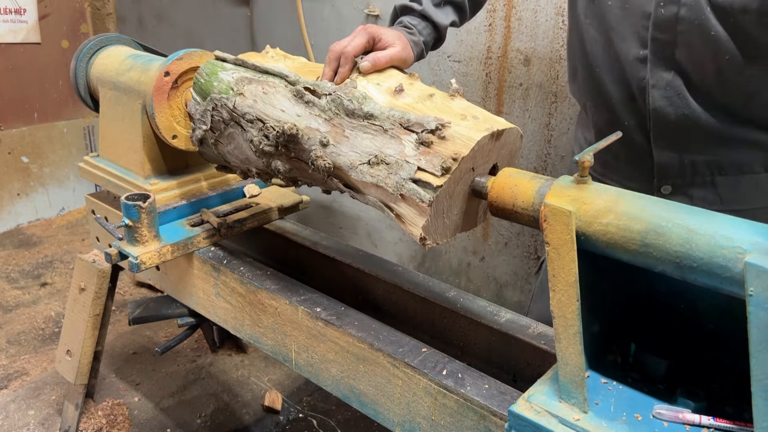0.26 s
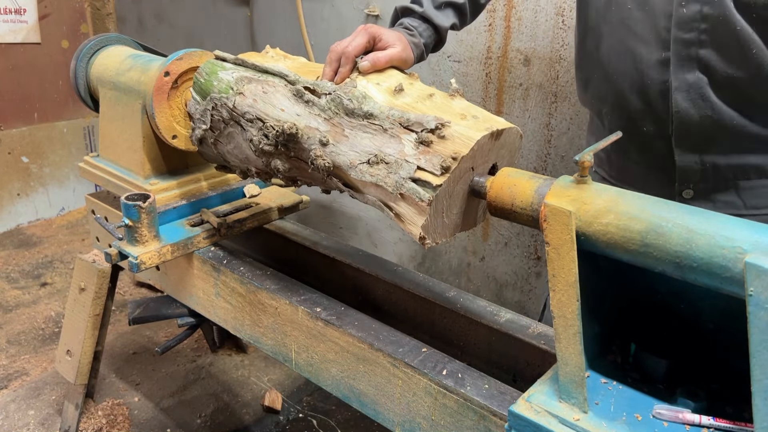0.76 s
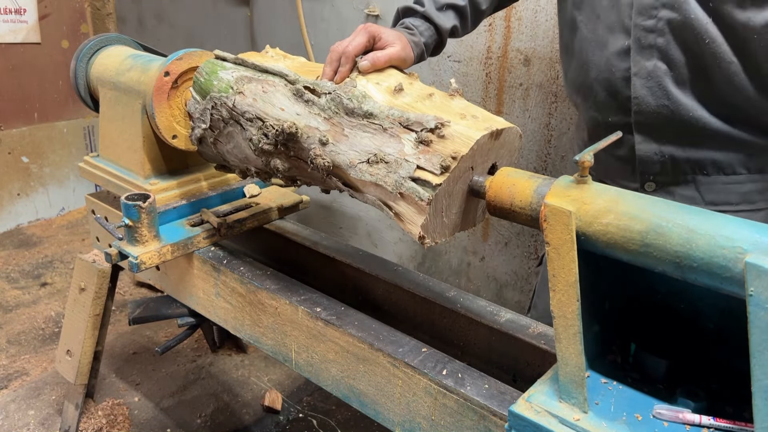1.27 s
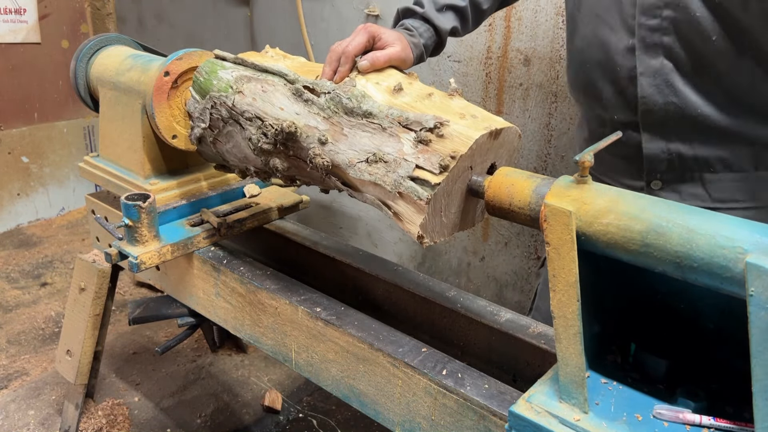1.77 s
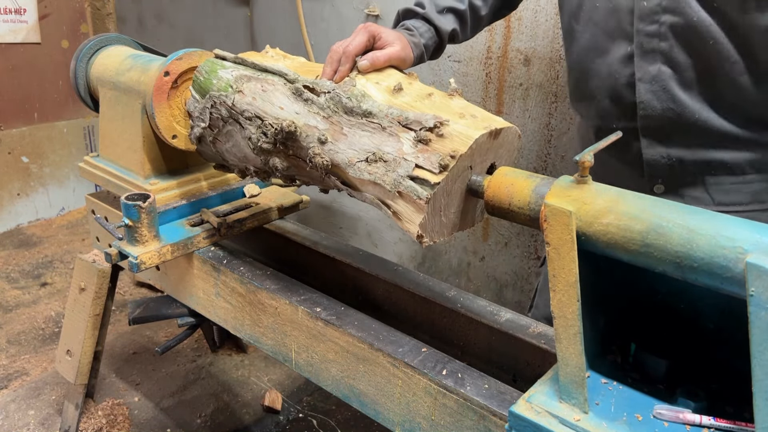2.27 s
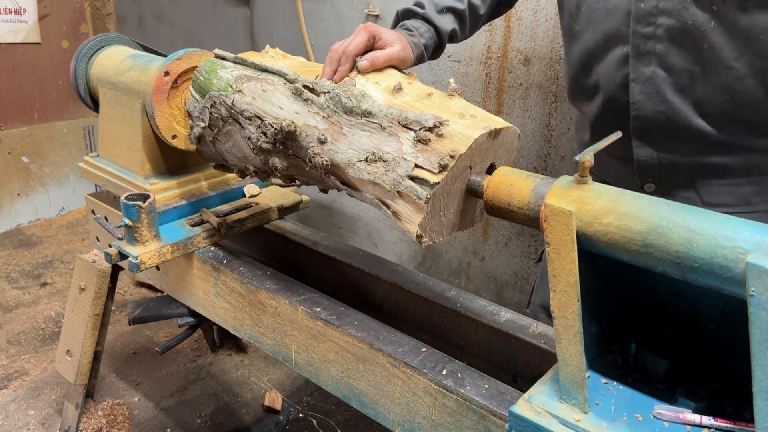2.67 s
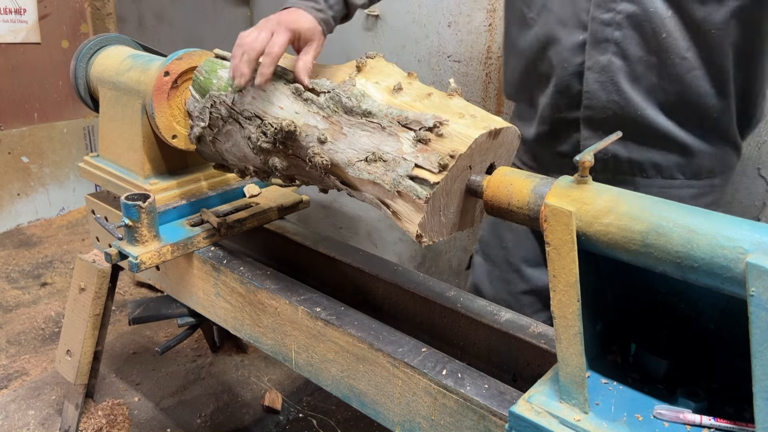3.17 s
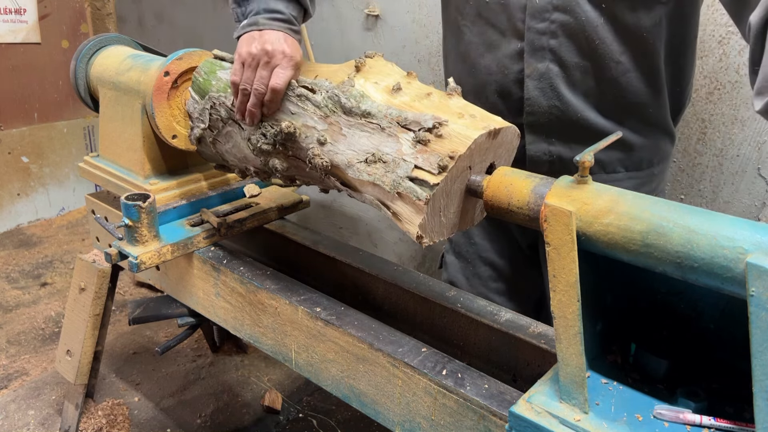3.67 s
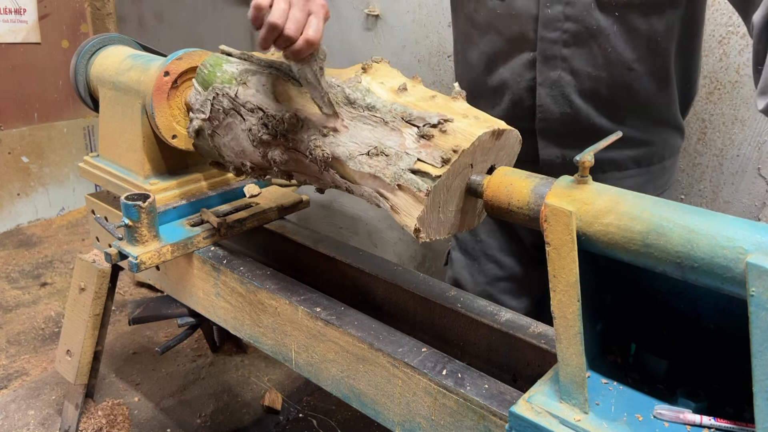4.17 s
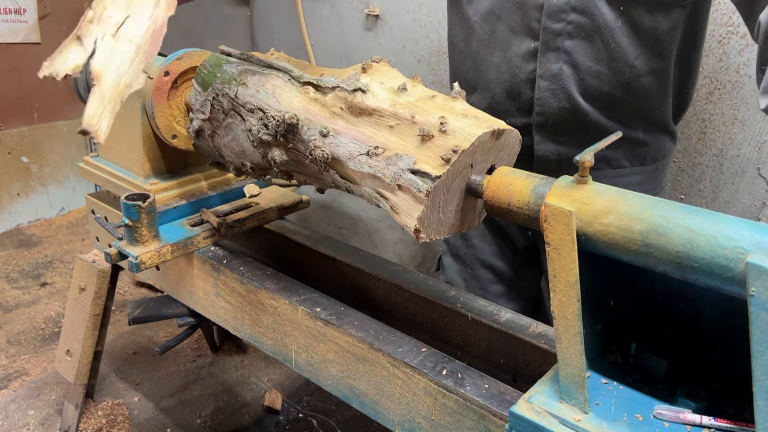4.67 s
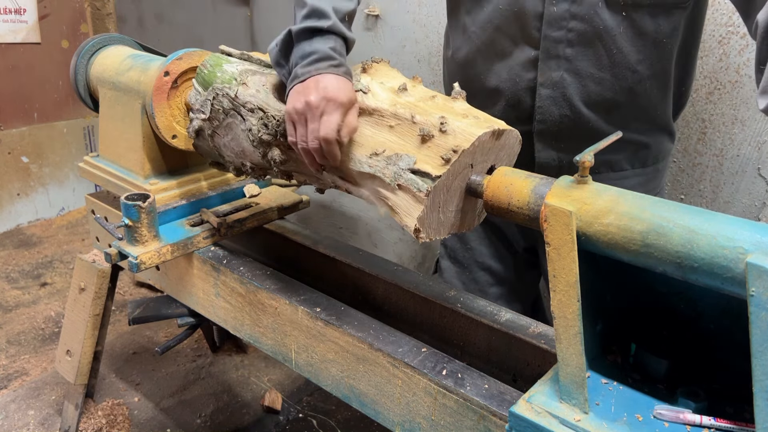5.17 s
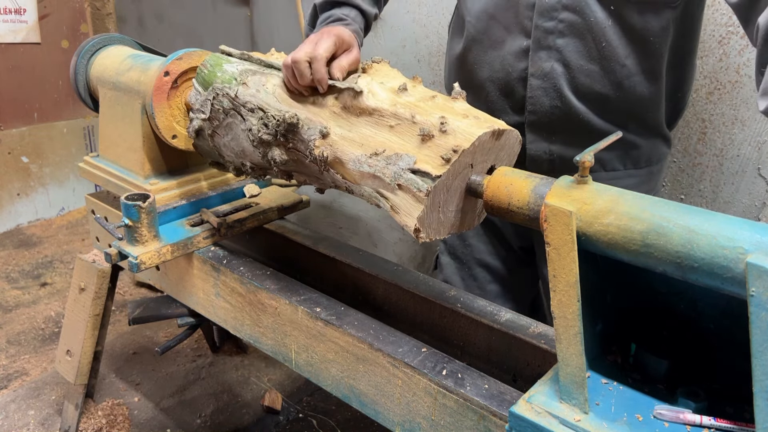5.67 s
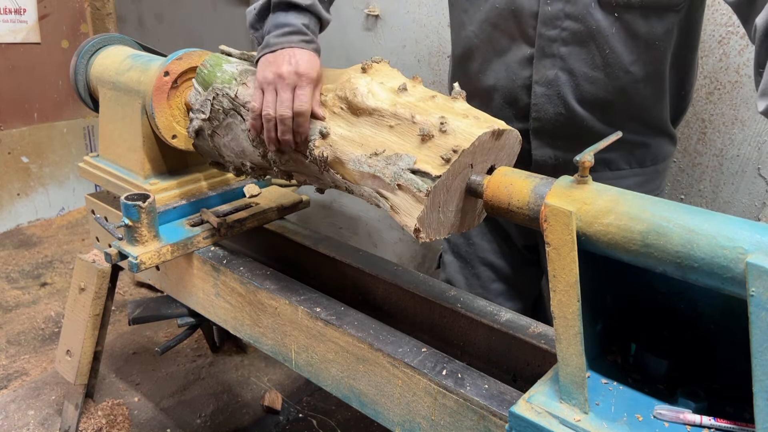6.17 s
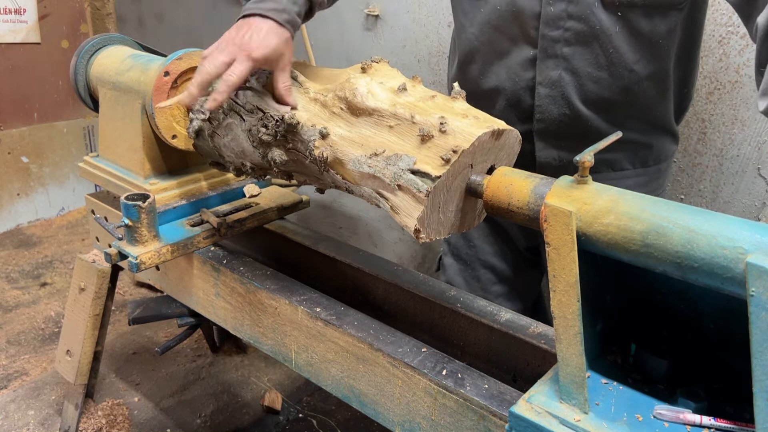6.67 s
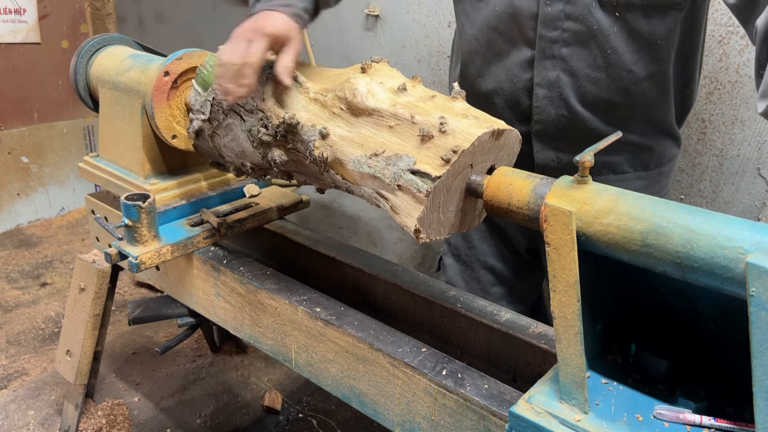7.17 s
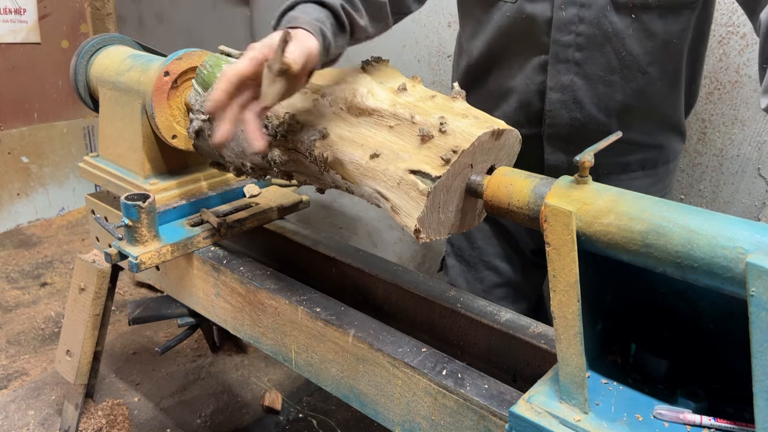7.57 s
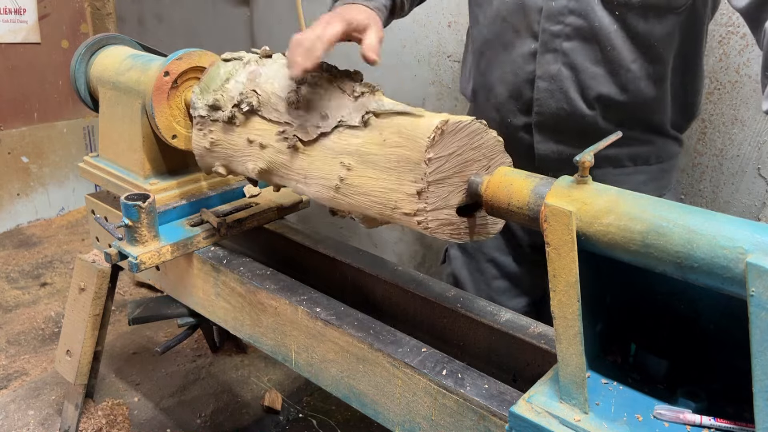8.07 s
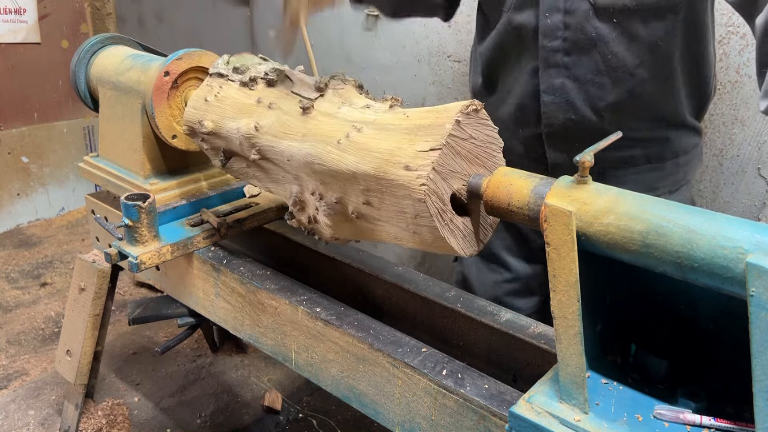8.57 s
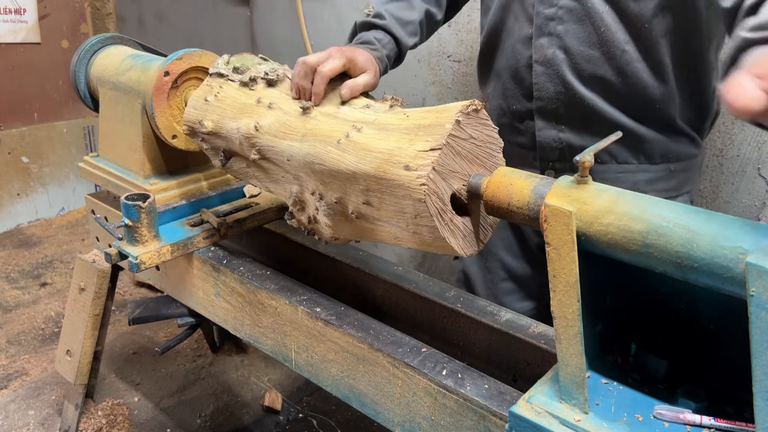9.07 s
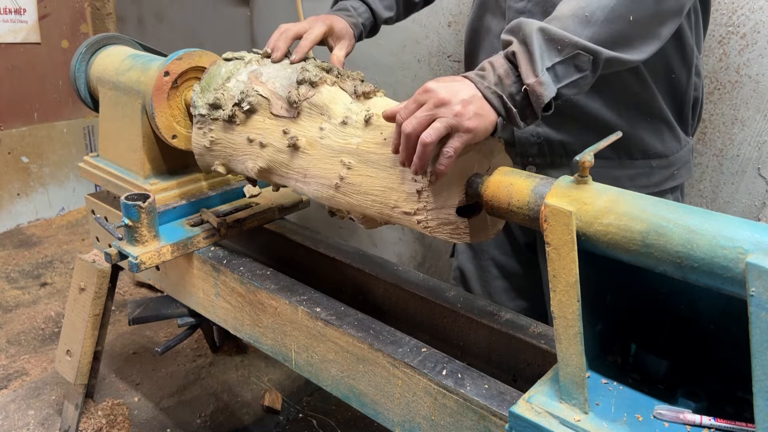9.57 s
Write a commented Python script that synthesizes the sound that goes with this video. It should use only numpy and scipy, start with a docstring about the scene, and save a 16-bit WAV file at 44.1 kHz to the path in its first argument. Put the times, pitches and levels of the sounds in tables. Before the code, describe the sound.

Brittle bark cracks and short fibrous tears in a small echoing workshop, after a few footfalls, with faint birds and a passing vehicle.

```python
"""Bark torn off a log in a workshop

Dry bark snaps off a log held in a lathe: noisy breaks strike resonant modes; torn fibres are sparse grains.
A soft knock at the end is made the same two ways. Slapping footfalls are struck modes too; rustling clothes
are swelling grainy noise. All these echo in the room. A vehicle passes outside as a drone and filtered noise;
birds and a thin whistle are gliding tones, and insects, traffic and air are shaped noise.
Two spaced microphones hear it."""
import sys
import numpy as np
from scipy import signal
from scipy.fft import rfft, irfft
from scipy.io import wavfile

SR = 44100
rng = np.random.default_rng(int(sys.argv[2]) if len(sys.argv) > 2 else 0)


def store_pcm(level_fs):
    """Save levels as 16-bit WAV."""
    pcm = np.round(np.clip(level_fs, -1, 1) * 32767).astype(np.int16)
    wavfile.write(sys.argv[1], SR, np.atleast_2d(pcm).T)


N = 433062


def amp(db):
    """Decibel law: the amplitude gain of a level in dB."""
    return 10 ** (np.asarray(db) / 20)


def rms_one(x):
    """Normalization of power: scale to an rms of 1."""
    return x / np.sqrt(np.mean(x ** 2) + 1e-20)


def in_time(rows):
    """Linear interpolation: the columns of a curve at every sample."""
    times, *columns = np.transpose(rows)
    return [np.interp(np.arange(N) / SR, times, column) for column in columns]


def at_hz(points, hz):
    """Logarithmic frequency scale: read a curve of (frequency, value) evenly by octaves."""
    point_hz, values = np.array(points).T
    return np.interp(np.log(hz), np.log(point_hz), values)


def drift(rate_hz):
    """Low-pass filtered noise: a slow random wander with spread 1."""
    step = 40  # samples between computed values
    pole = np.exp(-2 * np.pi * rate_hz * step / SR)
    white = rng.standard_normal(N // step + 2002)
    slow = signal.lfilter([1], [1, -2 * pole, pole ** 2], white)[2000:]  # skip the start of the filter
    return np.interp(np.arange(N) / step, np.arange(len(slow)), rms_one(slow))


# Likeness of the two sides, greatest in the bass: (frequency [Hz], correlation [0 to 1])
SIDE_LIKENESS = [(30, .0), (55, 0.81), (90, 0.784), (140, 0.17), (290, 0.042), (15000, 0)]


def coloured(white, spectrum):
    """Spectral shaping and coherence: filtered stereo noise, its bass partly shared by the sides; rms 1."""
    hz = np.maximum(np.arange(N // 2 + 1) * SR / N, 1)
    alike = np.clip(at_hz(SIDE_LIKENESS, hz), 0, 1)
    gain = amp(at_hz(spectrum, hz)) * (hz > spectrum[0][0])
    mid, side = rfft(white) * gain * np.sqrt([1 + alike, 1 - alike])
    return rms_one(irfft([mid + side, mid - side], N))


def grains(spread_db, share):
    """Sparse random impulses: white noise thinned to a share of uneven grains."""
    size_db = spread_db * np.minimum(rng.exponential(1, (2, N)), 4)
    present = rng.random((2, N)) < share
    return rng.standard_normal((2, N)) * amp(size_db) * present


def swells(events, sharpness):
    """Addition of powers: the gain over time of rubs that swell and fade."""
    power = np.zeros(N)
    for s, length, db in events:
        at, n = round(s * SR), round(length * SR)
        power[at:at + n] += amp(2 * db) * np.hanning(n)[:N - at] ** sharpness
    return np.sqrt(power)


def blows(events, modes, dull_hz, middle_hz, bright_hz,
          scatter_db, lag_ms, rough_db, rise_ms, first_click, ring_db):
    """Modal excitation: dying runs of uneven clicks strike damped modes; gives near and all-round sound."""
    near, all_round, t = np.zeros((2, N)), np.zeros(N), np.arange(4000) / SR
    hz, width_hz, mode_db = np.transpose(modes)
    decay = np.exp(-np.pi * width_hz / SR)[:, None]  # a wide mode dies quickly
    samples = np.arange(len(t))
    rings = (1 - decay) * decay ** samples * np.sin((2 * np.pi * hz / SR)[:, None] * samples)
    signs = (-1) ** np.arange(len(hz))  # neighbouring modes start in opposite phase
    for s, db, pan_db, ring_hz, bright_db, ms, dull_db in events:
        tilt = at_hz([(dull_hz, dull_db), (middle_hz, 0), (bright_hz, bright_db)], hz)
        # the piece that moves favours the modes near its own pitch
        tilt += ring_db * np.exp(-(np.log2(hz / ring_hz) / 0.33) ** 2)
        scatter = scatter_db * rng.standard_normal((2, len(hz)))
        strengths = amp(mode_db + tilt + scatter) * signs

        clicks = rng.standard_normal(len(t)) * amp(rough_db * rng.exponential(1, len(t)))
        clicks *= np.exp(-t * 1000 / ms) * np.minimum(t * 1000 / rise_ms, 1)
        # one strong click as the rise ends
        clicks[round(rise_ms * SR / 1000)] += first_click * np.sqrt(np.sum(clicks ** 2))
        sound = signal.fftconvolve(strengths @ rings, clicks[None], axes=1)[:, :len(t)]

        # height of a dying sine with the same energy
        height = 2 * np.sqrt(np.sum(sound ** 2, axis=1, keepdims=True) / (ms * SR / 1000))
        sound *= amp(db + pan_db * np.array([[.5], [-.5]])) / height

        # unscattered colour sent towards the walls, with the mean energy of the two sides
        even = amp(mode_db + tilt) * signs @ rings
        even *= np.sqrt(np.mean(np.sum(sound ** 2, axis=1)) / np.sum(even ** 2))
        at = round(s * SR)
        all_round[at:at + len(t)] += even[:N - at]

        # the microphones stand apart: one side hears it first
        lag = rng.uniform(-.5, .5) * lag_ms / 1000
        for side, delay in enumerate([lag, -lag]):
            at = round((s + delay) * SR)
            near[side, at:at + len(t)] += sound[side, :N - at]
    return near, all_round


# Far traffic: (time [s], hum level [dB])
TRAFFIC_HUM = [(0.0, -52), (3.33, -54.5), (5.4, -48), (5.7, -44.5), (6.12, -44.5), (6.5, -49), (7.45, -49),
               (7.75, -55), (8.7, -49.5), (9.35, -52.5), (9.82, -45)]
# Spectrum of the traffic: (frequency [Hz], density [dB per Hz])
TRAFFIC_SPECTRUM = [(12, -37.5), (20, 4), (49, -7.5), (81, -2), (95, -0.5), (119, -8), (150, -12),
                    (188, -16), (260, -17), (340, -45.5), (570, -120)]
DEEP_DB, DEEP_SWING = -58.5, 1.7  # deep level when the hum is at its mean; ratio of the swings in dB


def traffic():
    """Band-split noise: a hum around 90 Hz and a deeper rumble that swells with it, but more."""
    hum_db, = in_time(TRAFFIC_HUM)
    both = coloured(rng.standard_normal((2, N)), TRAFFIC_SPECTRUM)
    deep = signal.sosfiltfilt(signal.butter(2, 55, fs=SR, output="sos"), both)
    deep_db = DEEP_DB + DEEP_SWING * (hum_db - hum_db.mean())
    return amp(hum_db) * rms_one(both - deep) + amp(deep_db) * rms_one(deep)


# Spectrum of the open air: (frequency [Hz], density [dB per Hz])
AIR_SPECTRUM = [(88, -38), (150, -1), (1280, -18.5), (2050, -23), (3040, -23), (3930, -29.5), (4870, -20),
                (5590, -31), (8970, -36.5), (12300, -52), (15300, -58.5), (16500, -61)]
AIR_MEAN_DB, AIR_FOLLOWS = -56.5, .3  # mean level; share of the traffic's swing


def air():
    """Broadband noise: a hiss whose level drifts and partly follows the traffic."""
    hum_db, = in_time(TRAFFIC_HUM)
    level_db = AIR_MEAN_DB + AIR_FOLLOWS * (hum_db - hum_db.mean()) + 1.5 * drift(1.0)
    return amp(level_db) * coloured(rng.standard_normal((2, N)), AIR_SPECTRUM)


INSECT_HZ, INSECT_WIDTH_HZ, INSECT_DB, INSECT_THROB_HZ = 4660, 780, -81.5, 5.3


def insects():
    """Amplitude-modulated band noise: a far trilling that throbs unevenly."""
    edges = [INSECT_HZ - INSECT_WIDTH_HZ / 2, INSECT_HZ + INSECT_WIDTH_HZ / 2]
    band_pass = signal.butter(2, edges, "band", fs=SR, output="sos")
    band = signal.sosfilt(band_pass, rng.standard_normal((2, N)))
    return amp(INSECT_DB + 5.0 * drift(INSECT_THROB_HZ)) * rms_one(band)


# Single notes, levels before the mix:
# (time [s], length [s], first pitch [Hz], last pitch [Hz], level [dB], wavering [Hz])
BIRD_NOTES = [(3.245, 0.0863, 1627, 1446, -62, 363), (6.7, 0.063, 3507, 3474, -63.5, 110),
              (7.041, 0.0626, 5020, 4960, -63.5, 40), (7.609, .05, 4234, 4200, -70.5, 30.33),
              (8.07, 0.0625, 3100, 3133, -65, 180), (8.193, 0.097, 3810, 3582, -63, 29),
              (8.436, 0.069, 3560, 3540, -55.5, 40)]
# A three-note chirp, up, held, down:
# (offset [s], length [s], first pitch [Hz], last pitch [Hz], relative level [dB], wavering [Hz])
CHIRP_NOTES = [(0, 0.03924, 3160, 3388, -4, 199), (0.02, 0.0619, 3533, 3480, -2.5, 110.6),
               (0.066, .085, 3080, 2760, -8.5, 230)]
# When the chirp sounds, levels before the mix: (time [s], level [dB])
CHIRP_TIMES = [(.905, -57.5), (2.52, -61.5), (9.232, -58)]


def birds():
    """Frequency modulation: gliding notes with a randomly wavering pitch and a fluttering level."""
    out, waver, flutter = np.zeros((2, N)), drift(120.), drift(70.)
    chirps = [(s + offset, length, first_hz, last_hz, db + note_db, waver_hz)
              for s, db in CHIRP_TIMES
              for offset, length, first_hz, last_hz, note_db, waver_hz in CHIRP_NOTES]
    for s, length, first_hz, last_hz, db, waver_hz in BIRD_NOTES + chirps:
        at, n = round(s * SR), round(length * SR)
        pitch = np.linspace(first_hz, last_hz, n) + waver_hz * waver[at:at + n]
        flutter_db = min(waver_hz / 20, 5) * flutter[at:at + n]  # wavering notes flutter more
        level = np.sqrt(2) * amp(db + flutter_db) * np.hanning(n) ** .4
        out[:, at:at + n] += level * np.sin(2 * np.pi * np.cumsum(pitch) / SR)
    return out


# One long thin whistle, levels before the mix: (time [s], pitch [Hz], level [dB])
WHISTLE_CURVE = [(8.66, 3935, -60.5), (8.76, 3863, -51.5), (8.86, 3899, -65), (9.0, 3991, -69.5)]
WHISTLE_OCTAVE_DB, WHISTLE_EDGE_S, WHISTLE_WAVER_HZ = -22, .02, 16.43


def whistle():
    """Harmonic tone: a slightly bending fundamental with its weak octave."""
    hz, db = in_time(WHISTLE_CURVE)
    start, end = WHISTLE_CURVE[0][0], WHISTLE_CURVE[-1][0]
    on, = in_time([(start - WHISTLE_EDGE_S, 0), (start, 1), (end - WHISTLE_EDGE_S, 1), (end, 0)])
    phase = 2 * np.pi * np.cumsum(hz + WHISTLE_WAVER_HZ * drift(60.)) / SR
    tone = np.sin(phase) + amp(WHISTLE_OCTAVE_DB) * np.sin(2 * phase)
    return on * np.sqrt(2) * amp(db + 2.24 * drift(25.)) * tone


# Engine of the passing vehicle: (time [s], pitch [Hz], level [dB])
ENGINE_CURVE = [(4.3, 73.7, -63.5), (5.15, 87.71, -45.5), (5.33, 94.1, -50.5), (5.6, 102.1, -42.5),
                (6.27, 99.15, -36), (6.48, 97, -53.5), (6.85, 90, -52), (7.6, 83, -56.5)]
# Spectrum of the tyres: (frequency [Hz], density [dB per Hz])
TYRE_SPECTRUM = [(88, -22), (150, -11), (373, 1.5), (434, -5), (588, -3), (982, -2), (1160, -6.5),
                 (1870, -2.5), (2020, -10.5), (3010, -10), (3930, -16), (8710, -22.5), (14000, -40.5)]
CLOSEST_S, ROAR_DB, ABREAST_S = 6.192, -40, 0.0528  # time and level of the peak; its rounding
NEARING_DB_PER_S, LEAVING_DB_PER_S = 13.5, 18


def vehicle():
    """Tone and noise of a moving source: an engine drone, alike on both sides, and a passing tyre roar."""
    hz, engine_db = in_time(ENGINE_CURVE)
    start, end = ENGINE_CURVE[0][0], ENGINE_CURVE[-1][0]
    near, = in_time([(start - .3, 0), (start, 1), (end, 1), (end + 0.33, 0)])
    phase = 2 * np.pi * np.cumsum(hz + 1.152 * drift(3.81)) / SR
    drone = np.sqrt(2) * amp(engine_db) * np.sin(phase)

    since = np.arange(N) / SR - CLOSEST_S
    slope = np.where(since < 0, NEARING_DB_PER_S, LEAVING_DB_PER_S)
    roar_db = ROAR_DB - slope * (np.hypot(since, ABREAST_S) - ABREAST_S)
    roar_db += 0.89 * drift(7.85) + 1.03 * drift(34.0)
    return near * (drone + amp(roar_db) * coloured(rng.standard_normal((2, N)), TYRE_SPECTRUM))


# Soles scuffing, sleeves and clothes swishing: (time [s], length [s], level [dB])
CLOTH_SWISHES = [(.13, 0.0464, -56.5), (.4, 0.0415, -54.5), (.67, 0.0636, -56.5), (1.25, 0.023, -55),
                 (1.88, 0.0487, -58), (2.52, 0.141, -62), (3.0, 0.13, -70), (3.36, 0.0086, -58),
                 (3.86, 0.12, -57), (4.7, 0.02, -66), (4.8, 0.036, -66.5), (6.93, .12, -61.5),
                 (7.36, 0.24, -57.5), (8.15, 0.072, -66), (8.75, 0.0393, -63), (9.26, 0.044, -66),
                 (9.66, 0.0563, -59.5)]
# Spectrum of cloth: (frequency [Hz], density [dB per Hz])
CLOTH_SPECTRUM = [(880, -56), (1500, -17.5), (2600, -27), (3590, -16.5), (4220, -18.5), (7700, -15.5),
                  (15200, -28), (16500, -44.5)]
BRUSH_LEAD_S, BRUSH_S, BRUSH_DB = 0.1761, 0.1672, -66  # trouser legs brush ahead of each footfall
STRIDE_GAP_S, WALK_ENDS_S = .2, 3  # footfalls closer than the gap belong to one stride


def clothes():
    """Friction noise: grains of rubbing cloth swell with every stride and with the arms."""
    falls = [s for (s, *_), (later, *_) in zip(FOOTFALLS, FOOTFALLS[1:])
             if later - s > STRIDE_GAP_S and s < WALK_ENDS_S]
    strides = [(s - BRUSH_LEAD_S, BRUSH_S, BRUSH_DB) for s in falls]
    rubbing = coloured(grains(spread_db=2.0, share=.4), CLOTH_SPECTRUM)
    return swells(CLOTH_SWISHES + strides, sharpness=1.7) * rubbing


# Footfalls: (time [s], strength [dB], left-right difference [dB], ring of the sole [Hz],
# bright part [dB], slap decay [ms], dull part [dB])
FOOTFALLS = [(0.178, -37, 1, 910, -30, 4.34, -7.5), (0.443, -21, -1, 910, -30.5, 8.96, 0.5),
             (0.731, -18, -1, 890, -24, 6.73, -16), (1.044, -31.5, 0.5, 1900, 1.5, 4.9, -23.5),
             (1.364, -33.5, 3.5, 2910, -0.5, 5.4, -14.5), (1.624, -34, -4.5, 528, -56.5, 4.3, 0),
             (1.691, -41.5, 12.5, 1110, -1, 5.5, -15), (1.938, -7, 5, 2120, -16, 3.2, -8.5),
             (2.246, -11, 1.5, 1450, -18.5, 5.34, -11.5), (9.617, -39.5, 2, 479, -28, 15.2, 11.5)]
# Modes of the floor: (frequency [Hz], width [Hz], level [dB])
FLOOR_MODES = [(100.7, 27, 2), (162.6, 67, 5.5), (325, 54.6, -0.5), (525, 84.3, 0.5), (932, 601, -3.5),
               (1198.4, 659, -3.5), (1526, 383, -3.5), (2139, 370, -7), (3211, 185, -10), (3593, 165, -9.5),
               (4290, 2950, -14), (6510, 790, -13), (9010, 1130, -15), (11320, 16400, -25)]


def steps():
    """Impact on a damped resonator: slapping soles strike the modes of the floor."""
    return blows(FOOTFALLS, FLOOR_MODES, dull_hz=275, middle_hz=1296, bright_hz=5580,
                 scatter_db=0.5, lag_ms=3.0, rough_db=5.0, rise_ms=3.1, first_click=0.053, ring_db=2.0)


# Fibres tearing as a strip peels, and a soft knock at the end:
# (time [s], length [s], level before panning [dB])
TEARS_AND_KNOCK = [(3.635, 0.0327, -45.5), (3.94, 0.011, -38), (4.2, 0.0532, -27.5), (4.96, 0.035, -40),
                   (5.165, 0.0277, -36), (5.262, 0.0246, -30.5), (6.4, 0.0288, -43), (7.468, 0.0349, -36),
                   (8.305, .1, -34.5), (8.478, 0.0148, -30.5), (8.553, 0.047, -26.5), (9.005, 0.029, -35.5),
                   (9.716, 0.0384, -45)]
# Spectrum of tearing and knock: (frequency [Hz], density [dB per Hz])
TEAR_SPECTRUM = [(240, -33), (400, -7.5), (1120, -4), (1390, -6), (2670, -3), (3370, -4.5), (8720, -6.5),
                 (12700, -10), (15000, -13), (16500, -31.5)]


def tears_and_knock():
    """Crackling noise: sparse grains with a quickly wandering level, for torn fibres and a last soft knock."""
    crackle = grains(spread_db=3, share=.15) * amp(4 * drift(150))
    pan = amp([[1.0], [-1.0]])
    return swells(TEARS_AND_KNOCK, sharpness=0.984) * coloured(crackle, TEAR_SPECTRUM) * pan


# Bark snaps, and a soft knock at the end:
# (time [s], strength [dB], left-right difference [dB], ring of the struck piece [Hz], bright part [dB])
SNAPS_AND_KNOCK = [(3.472, -35.5, 6, 3680, -14.5), (3.6086, -25, 12.5, 7910, -5),
                   (3.6563, -24.5, 0, 3450, -20.5), (3.6877, -11.5, 2, 3910, -18.5),
                   (3.695, -20, 6.5, 1434, -23.5), (3.7185, -12.5, 5, 3870, -10.5),
                   (3.7531, -16, -2, 3190, -10), (3.764, -11.5, 8.5, 3290, -8.5),
                   (3.9392, -19.5, 4.5, 2520, -9.5), (3.9705, -14.5, -6.5, 9140, -8),
                   (4.079, -35, 6.5, 2330, -10.5), (4.0949, -32.5, 11, 2410, -14),
                   (4.1858, -29, 0.5, 2380, -13.5), (4.2053, -14.5, -5.5, 2670, -9.5),
                   (4.2622, -27.5, 11, 1590, -8), (4.9652, -23, 1, 1180, -15.5),
                   (4.9763, -25.5, -12.5, 8800, -12), (4.9811, -18.5, -1.5, 5580, -17.5),
                   (5.0378, -38, 6.5, 1410, -12), (5.0868, -35.5, 3.5, 1950, -14),
                   (5.1452, -32.5, 5.5, 2827, -9), (5.1674, -17, -7.5, 2500, -9),
                   (5.228, -18.5, 5.5, 1570, -4.5), (5.269, -27.5, -1, 1760, 0.5),
                   (5.2772, -14.5, 3.5, 2750, -19), (5.693, -15, 14.5, 3290, -6.5),
                   (5.7333, -13.5, 4, 8770, -13), (5.8247, -25, 5.0, 7200, -13),
                   (6.168, -27.5, 2, 1620, -1), (6.1833, -19, 1, 982, 1.5), (6.2876, -18.5, 4, 9555, -2),
                   (6.2991, -17, -3, 4056, -11), (6.3077, -15, 3.5, 6010, -12), (6.3709, -27.5, 2, 1700, 0),
                   (6.4116, -20.5, 7.0, 1490, -19), (6.4274, -21.5, 7, 7570, -6.5),
                   (6.4444, -28, 7, 915, -7.5), (6.7787, -28.5, 6, 1550, -22),
                   (6.8561, -11.5, 7.5, 8306, -4.5), (6.8615, -21, -2, 8400, -6.5),
                   (6.9176, -30.5, 5.5, 6100, -10.5), (7.2952, -32, 6, 918, -8),
                   (7.3416, -21.5, 3, 5930, -11.5), (7.4805, -19, -1, 9540, -0.5),
                   (7.7743, -35, 1.5, 1890, -28.5), (7.8392, -27, 7, 4900, -1.5),
                   (7.8455, -22, 9.5, 5770, -12), (8.3051, -13.5, -13.0, 2590, -11),
                   (8.3107, -13, -1.5, 2950, -13), (8.3257, -15, -0.5, 8730, -1.5),
                   (8.3411, -13, 3.5, 4030, -11.5), (8.353, -21.5, 5, 8690, -13.5),
                   (8.3755, -18.5, 1.0, 2470, -10), (8.454, -33.5, -1, 3390, -5.5),
                   (8.4805, -17, 7, 2570, -11), (8.4972, -13.5, 5.5, 8860, -12),
                   (8.5594, -18, 6.0, 7400, -8), (8.5699, -14.5, -5.5, 1018, -18.5),
                   (8.5812, -15.5, 8.5, 5060, -28), (8.5919, -24, 8.5, 4870, -11),
                   (9.0077, -25, 10, 1680, -16.5), (9.0122, -19.5, 5, 4640, -15.5),
                   (9.0275, -22, 1, 1440, -5), (9.0966, -30, 5.5, 2746, -13.5),
                   (9.1186, -30.5, -1, 3630, -15), (9.1708, -34.5, 5.5, 4200, -16),
                   (9.7232, -23, 3.5, 1600, -17.5)]
# Modes of the bark: (frequency [Hz], width [Hz], level [dB])
BARK_MODES = [(450, 900, -3), (802, 43, 6.5), (1128, 253, 4.5), (1577, 439, 3.5), (2532, 812, -4.5),
              (3087, 598, -1), (3653, 966, -4), (4364, 786, -1), (5478, 1674, 0.5), (7962, 1286, 2),
              (8708, 823, 6), (11290, 3740, 1.5), (12460, 2760, 0), (16540, 5800, 3.5)]
CLICKS_MS = 2.013  # decay time of the run of clicks
DULL_DB, DULL_DB_PER_OCTAVE, PIECE_HZ = -19, -6, 2640  # pieces that ring lower sound duller


def snaps_and_knock():
    """Modal excitation by fracture or impact: splintering breaks and a last soft knock excite the bark."""
    strikes = []
    for s, db, pan_db, ring_hz, bright_db in SNAPS_AND_KNOCK:
        dull_db = DULL_DB + DULL_DB_PER_OCTAVE * np.log2(ring_hz / PIECE_HZ)
        strikes.append((s, db, pan_db, ring_hz, bright_db, CLICKS_MS, dull_db))
    return blows(strikes, BARK_MODES, dull_hz=872, middle_hz=2633, bright_hz=10160,
                 scatter_db=3.5, lag_ms=3.3, rough_db=3.0, rise_ms=0.43, first_click=0.923, ring_db=7.0)


# Reverberation of the workshop: (frequency [Hz], time to fall by 60 dB [s])
WORKSHOP_DECAY = [(150, 0.39), (500, 0.2855), (1500, 0.2645), (4000, 0.2354), (9000, 0.2233),
                  (15000, 0.1054)]


def workshop(x, gap_ms):
    """Diffuse reverberation: convolution with noise dying by band, unlike on each side, faded in."""
    t, edges, echo = np.arange(SR // 2) / SR, 100 * 2 ** np.arange(0, 7.6, .5), 0
    for low, high in zip(edges, edges[1:]):
        band_pass = signal.butter(2, [low, high], "band", fs=SR, output="sos")
        band = signal.sosfilt(band_pass, rng.standard_normal((2, len(t))))
        echo = echo + band * amp(-60 * t / at_hz(WORKSHOP_DECAY, np.sqrt(low * high)))
    echo *= np.clip(t * 1000 / gap_ms, 0, 1)
    echo /= np.sqrt(np.sum(echo ** 2) / 2)
    return signal.fftconvolve(x, echo, axes=1)[:, :N]


def scene():
    """Superposition: the near sounds, their reverberation and the surroundings."""
    surroundings = traffic() + air() + insects() + vehicle()
    calls, cloth = birds() + whistle(), clothes()
    steps_near, steps_round = steps()
    crackling = tears_and_knock()
    strikes_near, strikes_round = snaps_and_knock()

    to_room = amp(-6.0) * strikes_round + amp(-9.0) * crackling + amp(-5.0) * steps_round
    to_room = to_room + amp(1.0) * calls + amp(-15.0) * cloth
    near = strikes_near + crackling + steps_near + cloth + amp(-3.5) * calls
    return near + workshop(to_room, gap_ms=1.98) + surroundings


CUTOFF_HZ = 16350  # from here up everything is at least 45 dB down


def record(dry):
    """Low-pass filtering: the top is cut steeply."""
    return signal.sosfilt(signal.cheby2(10, 45, CUTOFF_HZ, fs=SR, output="sos"), dry)


dry = scene()
out = record(dry)
store_pcm(out)
```